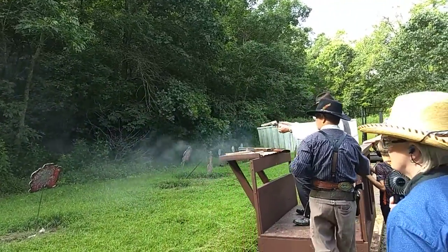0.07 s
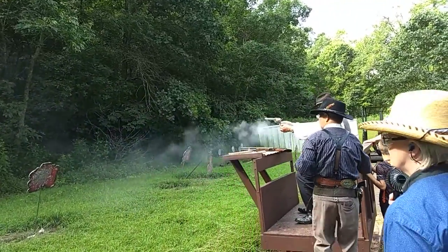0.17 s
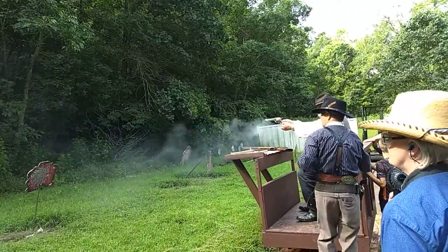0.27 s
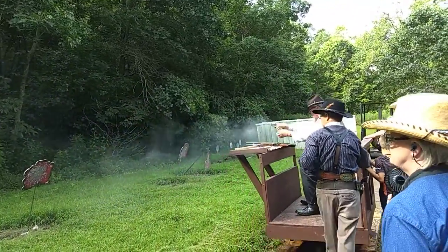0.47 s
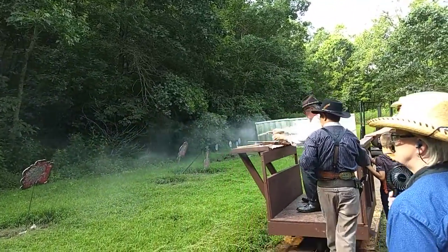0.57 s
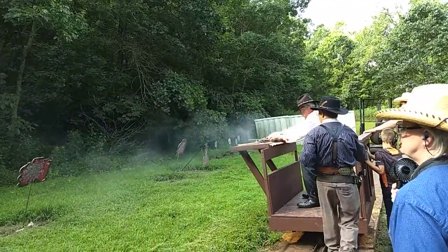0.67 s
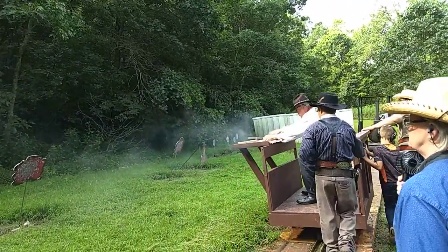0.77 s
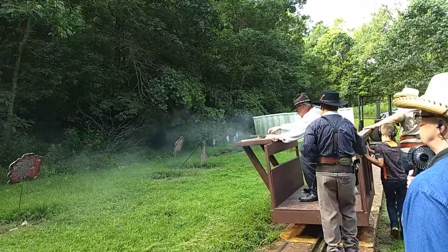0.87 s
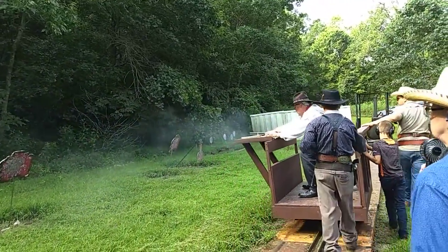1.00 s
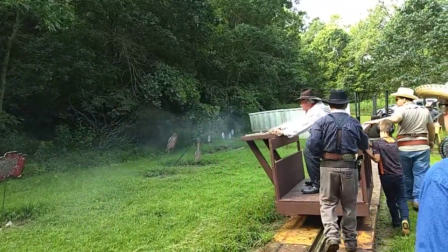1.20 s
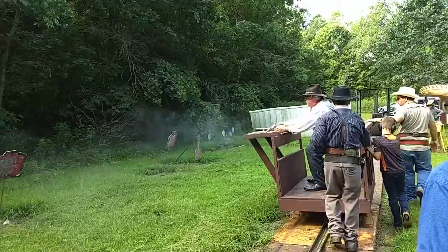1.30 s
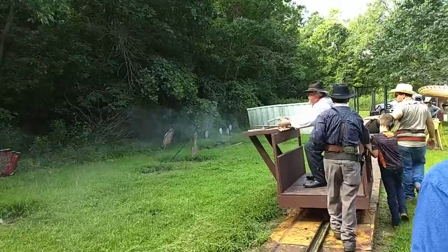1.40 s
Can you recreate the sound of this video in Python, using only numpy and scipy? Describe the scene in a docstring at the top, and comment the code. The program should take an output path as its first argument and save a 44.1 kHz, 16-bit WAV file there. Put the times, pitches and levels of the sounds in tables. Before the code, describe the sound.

One very loud revolver shot cracks on a grassy range, overloading the microphone a few metres behind the shooter. A steel target rings instantly, the echo fades through the woods, and a wooden cart thuds faintly.

```python
"""One revolver shot on a grassy range edged by woods, heard from a few metres behind the shooter.
The muzzle cracks with sharp pressure pulses inside a roar of gas, overloading the microphone.
An instant later the bullet sets a steel plate ringing, and the trees scatter the shot into a long tail.
The shooter's wooden cart thuds on its rails and the gun ticks in the hand, over faint outdoor air."""
import sys
import numpy as np
from scipy import signal
from scipy.fft import rfft, irfft, next_fast_len
from scipy.io import wavfile
from scipy.ndimage import uniform_filter1d

SR = 44100
rng = np.random.default_rng(int(sys.argv[2]) if len(sys.argv) > 2 else 0)


def bounce(signal):
    """Save signal as a 16-bit WAV file at the path given by the first command-line argument."""
    frames = np.transpose(np.atleast_2d(signal))
    limited = np.clip(frames, -1, 1)
    pcm = np.round(limited * 32767).astype(np.int16)
    wavfile.write(sys.argv[1], SR, pcm)


N = 63945
TIME = np.arange(N) / SR
SHOT_S, HIT_S = 0.2112, 0.2333
CUTOFF_HZ = 16000
LEFT_RIGHT = np.array([[1], [-1]])


def from_db(db):
    """Decibels to gain."""
    return 10 ** (np.asarray(db) / 20)


def rms_one(x):
    """Scale to rms 1."""
    return x / np.sqrt(np.mean(x ** 2) + 1e-20)


def at_hz(table, hz):
    """A table's columns, interpolated along log frequency."""
    freqs, *columns = np.transpose(table)
    return [np.interp(np.log(hz), np.log(freqs), column) for column in columns]


def pan(db):
    """Left and right gains, db apart; positive leans left."""
    return from_db(db * LEFT_RIGHT / 2)


def decay(start, t60):
    """Silence, then an exponential fall of 60 dB every t60 seconds."""
    return (TIME >= start) * np.exp(-np.log(1000) * np.maximum(TIME - start, 0) / t60)


def drift(per_s):
    """A slow glide between random values."""
    knots = rng.standard_normal(200)
    return np.interp(TIME * per_s + rng.random(), np.arange(len(knots)), knots)


def stereo(mid, side, correlation):
    """Left and right from two unrelated noises: correlation 1 is mono, 0 is wide."""
    return np.sqrt(1 + correlation) * mid + np.sqrt(1 - correlation) * side * LEFT_RIGHT


def band_noise(low_hz, high_hz, correlation):
    """Stereo noise in one band, rms 1."""
    bandpass = signal.butter(2, [low_hz, high_hz], "band", fs=SR, output="sos")
    mid, side = signal.sosfilt(bandpass, rng.standard_normal((2, N + SR // 10)))[:, -N:]
    return rms_one(stereo(mid, side, correlation))


def coloured_noise(spectrum, image):
    """Noise with a given spectrum and stereo image, rms 1."""
    size = next_fast_len(N)
    hz = np.maximum(np.arange(size // 2 + 1) * SR / size, 1)
    correlation, pan_db = at_hz(image, hz)
    gain = from_db(at_hz(spectrum, hz)[0]) * pan(pan_db) * (hz > 20)
    mid, side = rfft(rng.standard_normal((2, size)))
    return rms_one(irfft(gain * stereo(mid, side, correlation), size)[:, :N])


# Stereo image of the range, shared by air, woods and plate.
# Each row: frequency in Hz, left-right correlation, pan in dB.
RANGE_IMAGE = [(60, 1, 0.5), (484, .88, 0.9), (1300, 0.12, 4), (2350, 0.42, 3), (4500, .7, 2.5),
               (8000, 0.73, -.5), (15000, .45, -2.5)]
# Tone of the air bed and of the wash. Each row: frequency in Hz, relative level in dB.
AIR_SPECTRUM = [(30, -10.5), (80, -4.5), (170, -2), (300, -7), (700, -10), (1300, -20), (2600, -27),
                (4500, -19.5), (7500, -18.5), (9500, -31), (15500, -37)]
WASH_SPECTRUM = [(40, -28.5), (150, -19), (380, 0.5), (1000, -4), (1800, -9), (4500, -16), (9000, -30.5),
                 (15500, -35.5)]


def air():
    """A bed of outdoor rumble and hiss, with a midrange wash already fading before the shot."""
    bed = from_db(-56) * coloured_noise(AIR_SPECTRUM, RANGE_IMAGE)
    wash = from_db(-45.5) * coloured_noise(WASH_SPECTRUM, RANGE_IMAGE) * decay(0, t60=2)
    return bed + wash


# Gun-handling ticks. Each row: start in seconds, level in dB.
HANDLING_TICKS = [(0.833, -54), (0.886, -51)]


def gun_handling():
    """Thin metallic clicks as the gun is handled."""
    envelope = sum(from_db(db) * decay(start, t60=0.017) for start, db in HANDLING_TICKS)
    return band_noise(8570, CUTOFF_HZ, correlation=0.41) * envelope


# Dull wooden thuds. Each row: start in seconds, level in dB, centre frequency in Hz.
CART_THUDS = [(0.545, -37, 134), (0.593, -39.5, 185), (0.651, -42.5, 118), (.842, -46, 216),
              (0.866, -42, 107), (.924, -52, 114)]


def cart(roll_start_s=0.61, rise_s=0.012):
    """The wooden cart bumps on its rails and rolls on with a low rumble."""
    out = from_db(-57) * band_noise(73, 206, correlation=1) * (TIME >= roll_start_s)
    spread = 2 ** 0.59  # 0.59 octaves either side
    for start, db, hz in CART_THUDS:
        age = np.maximum(TIME - start, 0) / rise_s
        bump = age * np.exp(1 - age)
        out += from_db(db) * bump * band_noise(hz / spread, hz * spread, correlation=1)
    return out


# The shot's reverb tail. Each row: frequency in Hz, near level in relative dB per Hz,
# near t60 in seconds, far level in relative dB per Hz, far t60 in seconds.
WOODS_SCATTER = [(35, -22, 0.33, -33, 0.6), (102, -5, 0.17, -21.5, 2.0), (240, 3.5, 0.29, -22, 2.2),
                 (565, 9.5, .33, -13, 1.62), (1000, 4.5, 0.32, -19.5, 1.704),
                 (2005, 2.5, 0.12, -14.5, 1.13), (4460, 0, 0.28, -13.5, 0.9), (8000, -4, 0.43, -22.5, 0.94),
                 (12300, -10.5, 0.4, -23, 0.59), (15900, -19.5, .28, -29.5, 0.55)]


def woods(rise_s=0.012):
    """Ground and trees scatter the shot: near scatter dies fast, far scatter lingers and darkens."""
    edges_hz = np.geomspace(28, 17500, 19)
    tail = 0
    for low, high in zip(edges_hz, edges_hz[1:]):
        hz = np.sqrt(low * high)
        near_db, near_t60, far_db, far_t60 = at_hz(WOODS_SCATTER, hz)
        correlation, pan_db = at_hz(RANGE_IMAGE, hz)
        near = from_db(near_db) * decay(SHOT_S, near_t60)
        far = from_db(far_db) * decay(SHOT_S, far_t60)
        envelope = np.sqrt((high - low) * (near ** 2 + far ** 2))  # powers add across the band
        tail += envelope * pan(pan_db) * band_noise(low, high, correlation)
    attack = 1 - np.exp(-np.maximum(TIME - SHOT_S, 0) / rise_s)
    return from_db(-42) * tail * attack


# Tone of the plate's clang. Each row: frequency in Hz, relative level in dB.
CLANG_SPECTRUM = [(300, -20), (450, -8), (1500, -11), (2850, -1), (3500, -14.5), (4700, 2.5), (5300, -22),
                  (5900, -18), (9000, -9), (15000, -29)]


def plate_clang():
    """The hit wakes a crowd of weak plate modes that blur into a bright, rough clang."""
    return from_db(-6.5) * coloured_noise(CLANG_SPECTRUM, RANGE_IMAGE) * decay(HIT_S, t60=0.34)


# The steel plate's ringing modes. Each entry: frequency in Hz.
PLATE_MODE_HZ = [601, 728, 991, 1187, 1451, 1454, 1976, 2574, 2822, 3046, 3386, 3576, 3747, 4086, 4308,
                 4541, 4700, 5098, 5236]
# How those modes ring, in the same order. Each row: relative level in dB, t60 in seconds.
PLATE_MODE_RING = [(-4.5, 0.31), (-28, 2.09), (-27.5, 0.83), (-7, .3), (-7, 0.35), (-24.5, 1.374),
                   (-13.5, 0.57), (-15, 0.4), (-19, 0.64), (-5, .22), (-10.5, 0.23), (-14, .3),
                   (-16.5, .35), (-11.5, 0.29), (-16, 0.46), (-2.5, .3), (-12.5, 0.12), (-4, 0.22),
                   (-21, 0.5)]


def plate_ring():
    """The bullet strikes every mode at once; each wavers slowly as it rings."""
    ring = 0
    for hz, (db, t60) in zip(PLATE_MODE_HZ, PLATE_MODE_RING):
        correlation, pan_db = at_hz(RANGE_IMAGE, hz)
        # Each mode reaches the two sides out of step, which widens the ring.
        side_phase = np.arccos(correlation) / 2 * LEFT_RIGHT * rng.choice([-1, 1])
        tone = np.sin(2 * np.pi * (hz * TIME + rng.random()) + side_phase)
        waver = 1 + 0.2 * drift(per_s=9)
        ring += from_db(db) * pan(pan_db) * decay(HIT_S, t60) * waver * tone
    return from_db(-1.5) * ring


# Tone of the gas roar. Each row: frequency in Hz, relative level in dB.
ROAR_SPECTRUM = [(30, -17), (110, -8.5), (240, -5.5), (420, -5), (560, -6), (850, 1.5), (1800, -6),
                 (2650, -0.5), (3500, -6.5), (7500, -7.5), (15500, -17)]
# Stereo image of the roar. Each row: frequency in Hz, left-right correlation, pan in dB.
ROAR_IMAGE = [(80, -0.14, -6), (350, .85, 0.5), (800, 1, 2.5), (2500, 0.3, 6.5), (5000, .4, 2),
              (14000, 0.76, -4)]
# The crack: the muzzle wave and its near reflections.
# Each row: start in seconds, level in dB, length in seconds, pan in dB.
CRACK_PULSES = [(.2113, 8.5, 0.00052, -9), (.2168, 6, .0018, -3), (0.2212, 6, 0.0012, -3.5),
                (0.2295, -7.5, 0.00058, 3), (0.2319, 0, 0.0022, -5.5)]


def muzzle_blast():
    """N-shaped pressure pulses give the crack; a short roar of gas gives the body."""
    blast = from_db(10) * coloured_noise(ROAR_SPECTRUM, ROAR_IMAGE) * decay(SHOT_S, t60=0.11)
    for start, db, length, pan_db in CRACK_PULSES:
        age = (TIME - start) / length
        n_wave = (1 - 2 * age) * ((age >= 0) & (age < 1))
        blast += from_db(db) * pan(pan_db) * n_wave
    return blast


def scene():
    """Everything that reaches the microphone."""
    return muzzle_blast() + woods() + plate_ring() + plate_clang() + cart() + gun_handling() + air()


# Low thumps of overload. Each row: centre in seconds, level in dB, half-width in seconds, pan in dB.
OVERLOAD_SAGS = [(0.217, -20.5, 0.002, -14), (0.2334, -25, 0.0026, -18)]


def microphone_sag():
    """The overloaded microphone swings to one side and recovers after the strongest pulses."""
    return -sum(from_db(db) * pan(pan_db) * np.exp(-((TIME - centre) / half_width) ** 2)
                for centre, db, half_width, pan_db in OVERLOAD_SAGS)


def record(dry, threshold_db=-14, squeeze=0.47, detector_s=0.016, ceiling=0.93):
    """The microphone overloads, a compressor and soft clip hold the level down, the top is cut."""
    headroom = from_db(4.5)
    overloaded = headroom * np.tanh(dry / headroom)
    power = uniform_filter1d(np.mean(overloaded ** 2, axis=0), int(detector_s * SR))
    over_db = np.maximum(10 * np.log10(np.maximum(power, 1e-12)) - threshold_db, 0)
    compressed = overloaded * from_db(-squeeze * over_db)
    clipped = ceiling * np.tanh((compressed + microphone_sag()) / ceiling)
    lowpass = signal.cheby2(14, 60, CUTOFF_HZ + 600, fs=SR, output="sos")
    return signal.sosfilt(lowpass, clipped)


dry = scene()
out = record(dry)
bounce(out)
```